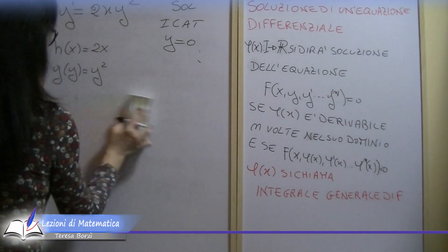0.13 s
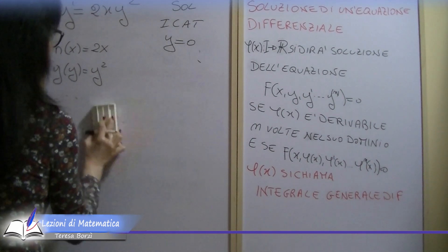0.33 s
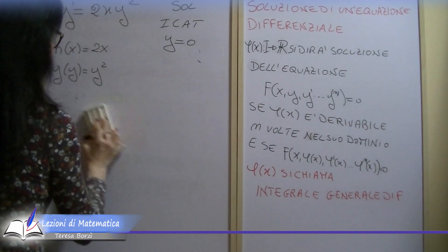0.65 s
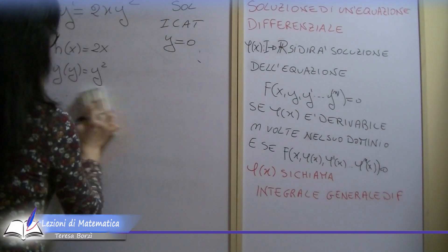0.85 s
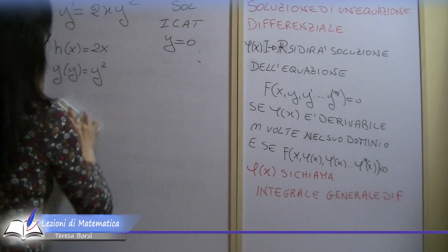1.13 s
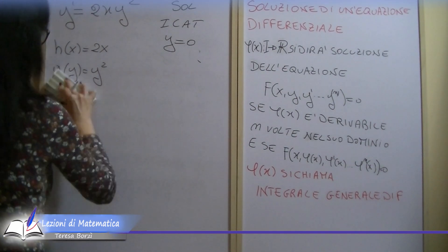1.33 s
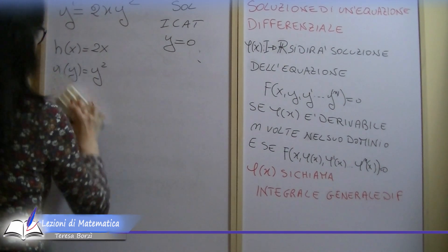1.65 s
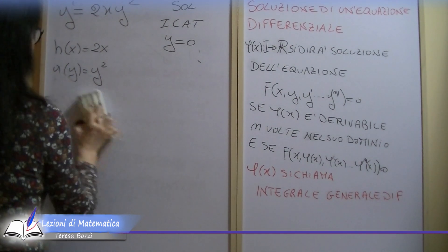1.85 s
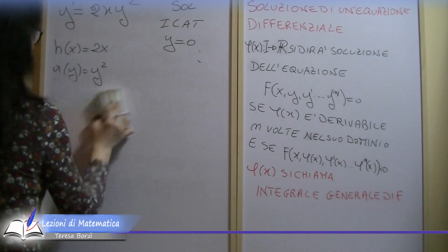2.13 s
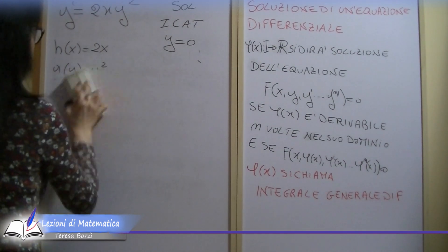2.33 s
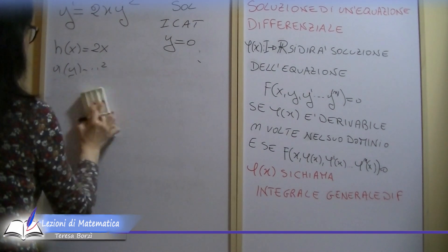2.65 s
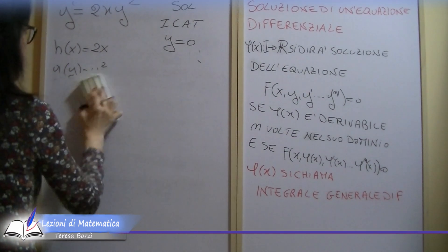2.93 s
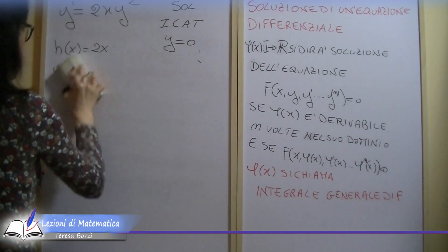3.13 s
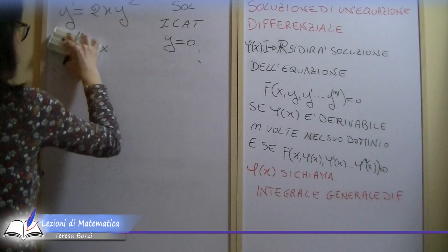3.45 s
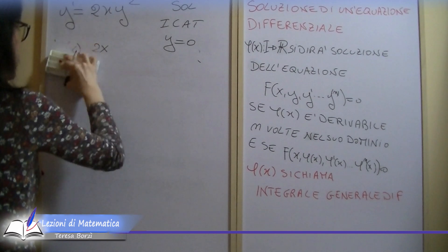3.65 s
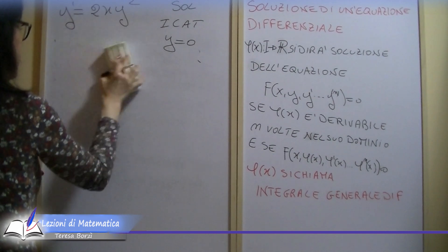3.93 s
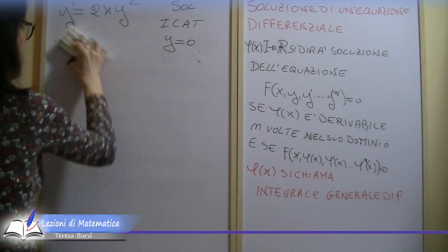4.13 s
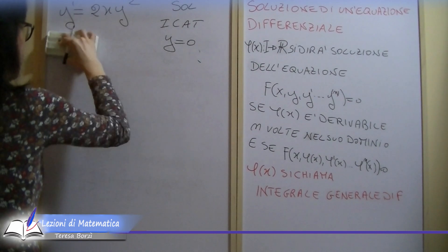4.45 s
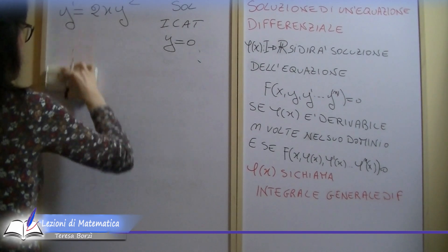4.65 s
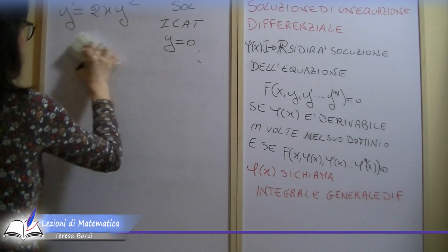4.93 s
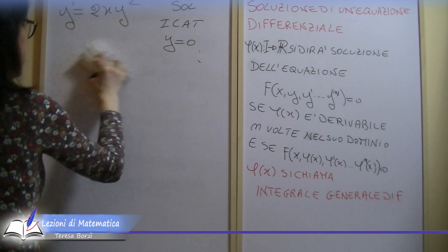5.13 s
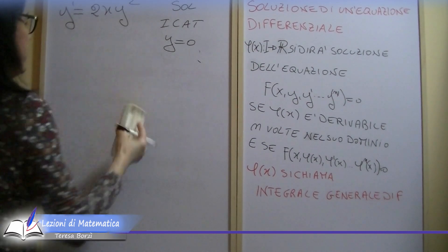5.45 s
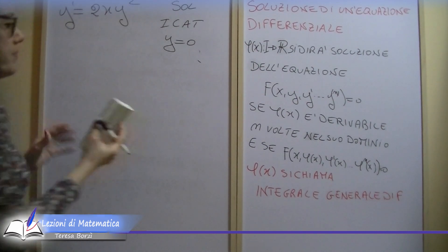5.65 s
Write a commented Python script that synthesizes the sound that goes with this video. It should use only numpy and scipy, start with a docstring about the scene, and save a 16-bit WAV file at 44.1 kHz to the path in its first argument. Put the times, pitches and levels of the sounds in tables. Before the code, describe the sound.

A felt eraser rubs back and forth across a whiteboard in quick, hissing strokes, with a light rasp and a hollow ring from the board. Its holder knocks on the board near the start and again a second later. After about five seconds the eraser lifts off, and the person turns with soft scuffs and a dull heel tap. It sounds close, in a small classroom with faint hiss.

```python
"""A felt eraser hisses back and forth over a whiteboard in a small classroom.
Its fibres stick and slip, which keeps the board and the eraser's hollow holder ringing.
Each push adds a rumble, and twice the holder stumbles and knocks on the board.
Then the eraser lifts off and the person shuffles round, with scuffs and a heel tap.
Room hiss, a thin electronic whine and a short repeating echo colour it all."""
import sys
import numpy as np
from scipy import signal
from scipy.fft import rfft, irfft
from scipy.io import wavfile
from scipy.ndimage import uniform_filter1d

SR = 44100
rng = np.random.default_rng(int(sys.argv[2]) if len(sys.argv) > 2 else 0)


def bounce(signal):
    """Save signal as a 16-bit WAV file at the path given by the first command-line argument."""
    frames = np.transpose(np.atleast_2d(signal))
    limited = np.clip(frames, -1, 1)
    pcm = np.round(limited * 32767).astype(np.int16)
    wavfile.write(sys.argv[1], SR, pcm)


N = 255383
TIME = np.arange(N) / SR
FREQS = np.maximum(np.arange(N // 2 + 1) * SR / N, 1)

# Strokes of the eraser; each starts as the hand turns. Each row: start in seconds, dip at the turn in dB,
# treble lost at the turn in dB, time to regain speed in seconds, rubbing level in dB, then four levels
# in dB against the felt's hiss: board ring, surface rasp, holder ring and hollow note.
HAND_STROKES = [(-0.05, 5.5, -2, 0.012, -42, -6.5, -10, -11, -13.5),
                (.143, 3.5, 0, 0.01, -42, -12, -14.5, -12.5, -13),
                (.44, 0.5, 0, 0.037, -42, -11, -9, -10.5, -8.5),
                (.74, 1.2, -0.5, 0.05, -42, -9.5, -7, -11, -15),
                (1.003, 3, 6, 0.024, -43, -10.5, -3.5, -16, -23),
                (1.419, 6.5, 3, 0.056, -43.5, -8, -3.5, -9, -10),
                (1.785, 3, -6, 0.031, -42.5, -8, -6, -8.5, -8),
                (2.1, 1.4, -1.5, 0.05, -42, -10, -7.5, -12, -9.5),
                (2.464, 1.5, 0, 0.03, -43.5, -13.5, -10, -12.5, -9),
                (2.73, 0, 1, 0.022, -43, -11, -7.5, -11, -10),
                (3.0, 1, -2.5, 0.021, -42.5, -9, -3.5, -15, -8),
                (3.198, 3, 1.5, 0.016, -42.5, -9, -4, -10.5, -20),
                (3.428, 4.5, 2, .022, -42, -12, -3, -10, -18),
                (3.597, 3, .5, 0.037, -42.5, -12, -4, -12, -10),
                (3.88, 2, -3.5, 0.054, -42, -10, -6, -12, -15),
                (4.19, 1, 0.5, 0.03, -43.5, -9.5, -3, -18, -20),
                (4.301, 1, 3, 0.031, -43.5, -12, -5.5, -14, -18),
                (4.439, 3, 1.5, .026, -42.5, -10, -4.5, -15, -16),
                (4.836, 2.7, -4, 0.011, -43, -7, -2.5, -12, -11)]
# The tone of the felt's hiss. Each row: frequency in Hz, relative level in dB.
FELT_TONE = [(100, -77), (300, -15.5), (700, -29.5), (1500, -10), (2500, -5), (3100, -2), (3700, -3),
             (4400, -1.5), (5300, -1.5), (6600, -9.5), (7800, -7.5), (9600, -4.5), (11500, -8.5),
             (13500, -15.5), (15700, -29)]
# The notes the whiteboard rings with. Each row: pitch in Hz, width in Hz, level in dB.
BOARD_NOTES = [(102, 18, -39.5), (150, 9.1, -32), (196, 15, -24.5), (254, 55, -30), (331, 31, -17),
               (380, 117, -23.5), (446, 33, -12), (549, 23, -11), (699.5, 31, -5.5), (846, 81, -4.5),
               (984, 45, 0), (1044, 32, 0.5), (1134, 41, 1.5), (1177, 70, 0.5), (1259, 125, -1),
               (1550, 84, -6.5), (1713, 26, -6)]
# The tone of the rasp from the board's surface. Each row: frequency in Hz, relative level in dB.
RASP_TONE = [(600, -36), (1200, -5), (1550, -1), (1850, -0.5), (2300, 1), (2800, -2.5), (4000, 0.5),
             (8000, -23.5)]
# Moments when the felt catches and sings. Each row: time of the peak in seconds,
# about half its length in seconds, pitch in Hz, level in dB against the rubbing.
FELT_CATCHES = [(0.239, 0.013, 1154, -6), (0.89, 0.046, 3220, -7), (3.077, .03, 3230, -3.5),
                (3.12, 0.03, 1550, -12), (3.277, .025, 1400, -10), (3.516, 0.029, 3320, -8),
                (3.525, 0.02, 1550, -15), (3.682, .03, 1680, -9), (4.015, 0.028, 3290, -2.5),
                (4.06, 0.017, 1175, -6), (4.744, 0.066, 1705, -13), (4.93, 0.022, 3290, -6),
                (4.95, 0.035, 923, -7), (5.05, 0.02, 1170, -4.5), (5.074, 0.028, 1550, -6)]
# The tone of the room's steady hiss. Each row: frequency in Hz, relative level in dB.
ROOM_TONE = [(25, -26), (60, -23), (120, -15.5), (250, -9), (500, 0), (800, 4), (1120, 6), (1600, 1),
             (3000, 2), (5000, 1), (7000, -1.5), (10000, -6), (13000, -9.5), (15700, -9.5)]
# Knocks of the holder on the board. Each row: start in seconds, strength on the board in dB,
# strength of the holder's clack in dB.
HOLDER_KNOCKS = [(0.143, -3.5, -42), (0.172, -14, -40), (0.267, -12.5, -50), (1.281, -10, -27),
                 (1.289, -8, -30), (1.298, -3, -23), (1.325, -4, -27)]
# The notes the knocked holder clacks with. Each row: pitch in Hz, width in Hz, level in dB.
HOLDER_NOTES = [(418, 71, -2.5), (520, 33, -1), (656, 45, 0), (800, 76, -5), (965, 42, 4.5), (1560, 55, -7),
                (2200, 79, -5), (2310, 50, -7)]
# Shoe and sleeve scuffs. Each row: start, rise time and fade time in seconds,
# centre and width of the noise in Hz, level of that noise in dB, level of the grit in dB.
BODY_SCUFFS = [(5.399, 0.0073, 0.016, 4600, 1600, -48.5, -44.5), (5.41, 0.011, 0.03, 895, 241, -47, -58),
               (5.437, 0.016, 0.018, 955, 130, -49, -62), (5.53, .012, 0.09, 517, 300, -51.5, -66),
               (5.55, 0.026, .11, 568, 90, -55, -72), (5.596, 0.021, 0.037, 1730, 1230, -43.5, -52),
               (5.6, 0.013, 0.043, 215, 110, -63.5, -72), (5.755, 0.026, .06, 2090, 3600, -44.5, -65)]
# The tone of the grit in a scuff. Each row: frequency in Hz, relative level in dB.
GRIT_TONE = [(100, -52), (1500, -1), (3600, -12), (4700, -1), (5550, -5), (5850, 2), (6400, -8),
             (10000, -13), (15000, -22)]
# A heel taps the floor. One row: start in seconds, centre in Hz, width in Hz, peak level in dB.
HEEL_TAP = (5.5314, 580, 480, -38)
# How wide the sound is. Each row: frequency in Hz, level in dB of the sides against the middle.
STEREO_WIDTH = [(30, 4), (80, -14), (300, -9), (700, -14), (1400, -28), (2800, -22.5), (5500, -14.5),
                (10000, -18), (14000, -36)]

LAST_HOLLOW_SWELL_END_S, LIFT_OFF_S = 4.93, 5.114


def from_db(db):
    """Turn decibels into a number to multiply by."""
    return 10 ** (np.asarray(db) / 20)


def unit_level(sound):
    """Scale a sound so that its average power is 1."""
    return sound / np.sqrt(np.mean(sound ** 2) + 1e-20)


def noise():
    """An even hiss: white noise."""
    return rng.standard_normal(N)


def drift(rate_hz):
    """A slow random wobble, about 1 in size."""
    return unit_level(irfft(rfft(noise()) / (1 + (FREQS / rate_hz) ** 2) ** 2, N))


def click(start):
    """The shortest possible blow: one sample."""
    return np.arange(N) == round(start * SR)


def hump(peak_s, half_s):
    """A smooth rise and fall around a moment."""
    return np.exp(-0.5 * ((TIME - peak_s) / half_s) ** 2)


def swell(start, rise_s, fade_s):
    """A straight rise, then a fade that slows as it goes."""
    rising = np.clip((TIME - start) / rise_s, 0, 1)
    return rising * np.exp(-np.maximum(TIME - start - rise_s, 0) / fade_s)


def colour(sound, tone):
    """Turn frequencies up or down to follow a tone table."""
    hz, db = np.transpose(tone)
    curve_db = np.interp(np.log(FREQS), np.log(hz), db)
    return irfft(rfft(sound) * from_db(curve_db), N)


def band(sound, hz, width_hz, order):
    """Keep the frequencies around a centre; order 1 rings like a single note."""
    low = np.hypot(hz, width_hz / 2) - width_hz / 2
    return signal.sosfilt(signal.butter(order, [low, low + width_hz], "band", fs=SR, output="sos"), sound)


def soften(sound, hz, order):
    """Keep the lows, as a soft contact or a wall does."""
    return signal.sosfilt(signal.butter(order, hz, fs=SR, output="sos"), sound)


def ringing(force, notes):
    """A force sets all of an object's notes ringing at once."""
    return sum((-1) ** k * from_db(db) * band(force, hz, width, order=1)
               for k, (hz, width, db) in enumerate(notes))


def slips(per_s, spread_db):
    """Surfaces stick and let go in tiny clicks of uneven size, so many that they merge."""
    size = from_db(spread_db * np.clip(noise(), -2, 2))
    slipping = rng.random(N) < per_s / SR
    return unit_level(slipping * np.sign(noise()) * size)


def stroke_levels():
    """Each stroke has its own levels; as the hand turns, the rubbing dips and its treble shifts."""
    blend_s, slowing_share = 0.085, 0.87  # slowing down is quicker than speeding up
    starts, _, _, _, *levels = np.transpose(HAND_STROKES)
    current = np.maximum(np.searchsorted(starts, TIME) - 1, 0)
    rub_db, *ringing_db = [uniform_filter1d(db[current], int(blend_s * SR)) for db in levels]
    dull_db = 0
    for start, dip_db, treble_loss_db, regain_s, *_ in HAND_STROKES:
        turn = hump(start, np.where(TIME < start, slowing_share * regain_s, regain_s))
        rub_db = rub_db - dip_db * turn
        dull_db = dull_db + treble_loss_db * turn
    return rub_db, dull_db, *ringing_db


def felt_hiss(slips_per_s, treble_db):
    """Patches of felt grip in turn, so seven bands of the hiss each waver by about 1 dB."""
    spectrum = rfft(colour(slips(slips_per_s, spread_db=2), FELT_TONE))
    half_octaves = np.clip(2 * np.log2(FREQS / 2000), 0, 6)
    patches = [irfft(spectrum * np.maximum(1 - np.abs(half_octaves - k), 0), N) for k in range(7)]
    hiss = unit_level(sum(patch * from_db(drift(rate_hz=12)) for patch in patches))
    lows = soften(hiss, hz=7000, order=1)
    return lows + (hiss - lows) * from_db(treble_db)


def holder_ring(slips_per_s):
    """The rubbed holder rings high, swelling and fading as the grip shifts."""
    ring = band(slips(slips_per_s, spread_db=2), hz=3290, width_hz=250, order=1)
    return unit_level(ring) * from_db(1.5 * drift(rate_hz=13))


def hollow_note():
    """The holder's hollow note is fullest in mid-stroke, where the hand is fastest."""
    left_at_turn = 0.64
    turns = [start for start, *_ in HAND_STROKES] + [LAST_HOLLOW_SWELL_END_S]
    strokes_done = np.interp(TIME, turns, np.arange(len(turns)))
    speed = np.abs(np.sin(np.pi * strokes_done))
    note = unit_level(band(slips(12000, spread_db=1), hz=1170, width_hz=135, order=2))
    return note * (left_at_turn + (1 - left_at_turn) * speed)


def eraser():
    """Slipping fibres hiss and drive the holder and the board; a stronger stroke makes more slips."""
    rub_db, dull_db, board_db, rasp_db, holder_db, hollow_db = stroke_levels()
    lift_loss_db = 6.5 * (np.maximum(TIME - LIFT_OFF_S, 0) / 0.11) ** 2
    effort_db = np.clip(rub_db - lift_loss_db - np.median(rub_db), -5, 5)
    slips_per_s = 26000 * from_db(effort_db / 2)
    hiss = felt_hiss(slips_per_s, treble_db=0.28 * effort_db - dull_db)  # quicker slips are sharper
    holder = from_db(holder_db) * holder_ring(slips_per_s)
    board = from_db(board_db) * unit_level(ringing(slips(slips_per_s, spread_db=3), BOARD_NOTES))
    rasp = from_db(rasp_db) * unit_level(colour(slips(slips_per_s / 2, spread_db=3.5), RASP_TONE))
    rings = holder + board + rasp + from_db(hollow_db) * hollow_note() + felt_catches()
    # At lift-off the trailing edge still drives the ringing, so it fades later than the hiss.
    return from_db(rub_db) * (from_db(-lift_loss_db) * hiss + from_db(-0.6 * lift_loss_db) * rings)


def room_hiss():
    """The room's quiet, steady background noise."""
    return from_db(-49.5) * unit_level(colour(noise(), ROOM_TONE))


def whine():
    """The electronics give off a thin, very high tone that wavers a little."""
    pitch_hz, level_db = 15625, -59.5
    level = from_db(level_db + drift(rate_hz=12))
    return level * np.sin(2 * np.pi * pitch_hz * TIME + 0.5 * drift(rate_hz=15))


def push_rumble():
    """The arm leans in at a steady pace, hardest the first time, and shakes the board's low notes."""
    first_s, every_s, level_db, first_extra_db = 0.165, 0.481, -65, 8
    pushes = sum(from_db(level_db + first_extra_db * (k == 0)) * hump(peak_s, half_s=0.047)
                 for k, peak_s in enumerate(np.arange(first_s, LIFT_OFF_S, every_s)))
    force = soften(slips(1500, spread_db=1), hz=132, order=2)
    return pushes * unit_level(ringing(force, BOARD_NOTES))


def holder_knocks():
    """The holder stumbles and clacks; its felt-cushioned blows leave the board flexing and rumbling."""
    starts, board_db, clack_db = np.transpose(HOLDER_KNOCKS)

    def rattle(levels_db, fade_s):
        """A spray of tiny contacts after each knock, falling 60 dB in fade_s."""
        level = sum(from_db(db - 60 * np.maximum(TIME - start, 0) / fade_s) * (TIME >= start)
                    for start, db in zip(starts, levels_db))
        return level * slips(9000, spread_db=-1.5)

    def blows(levels_db):
        """One sharp blow for each knock."""
        return sum(from_db(db) * click(start) for start, db in zip(starts, levels_db))

    clack = ringing(blows(clack_db + 17) + rattle(clack_db, fade_s=0.12), HOLDER_NOTES)
    thud = soften(blows(board_db + 4.5), hz=700, order=1)
    chatter = from_db(-36) * soften(rattle(board_db, fade_s=0.072), hz=480, order=1)
    flex = from_db(-10) * band(rattle(board_db, fade_s=0.38), hz=194, width_hz=190, order=2)
    return clack + ringing(thud + chatter + flex, BOARD_NOTES)


def felt_catches():
    """The felt catches for a moment, and a swell of slips sets one narrow note singing."""
    sound = np.zeros(N)
    for peak_s, half_s, hz, db in FELT_CATCHES:
        note = unit_level(band(slips(14000, spread_db=2.5), hz, width_hz=62, order=2))
        sound += from_db(db) * hump(peak_s, half_s) * note
    return sound


def scuffs():
    """Shoes and sleeves rub as the person turns: short puffs of noise with bright grit on top."""
    grit = unit_level(colour(slips(12000, spread_db=3), GRIT_TONE))
    sound = np.zeros(N)
    for start, rise_s, fade_s, hz, width_hz, puff_db, grit_db in BODY_SCUFFS:
        puff = unit_level(band(noise(), hz, width_hz, order=2))
        sound += from_db(puff_db) * swell(start, rise_s, fade_s) * puff
        sound += from_db(grit_db) * swell(start, rise_s=0.0082, fade_s=0.038) * grit
    return sound


def heel_tap():
    """A heel meets the floor in one dull tap."""
    start, hz, width_hz, peak_db = HEEL_TAP
    tap = band(click(start) + 1e-18, hz, width_hz, order=2)
    return from_db(peak_db) * tap / np.abs(tap).max()


def reflections(sound):
    """Sound bounces around the classroom and blurs into a short tail of about the same power."""
    fade_s = 0.3  # time to fall 60 dB
    tail = noise() * from_db(-60 * TIME / fade_s)
    return signal.fftconvolve(sound, tail / np.sqrt(np.sum(tail ** 2)))[:N]


def stereo_spread(sound):
    """Reflections reach the two close microphone openings slightly differently."""
    lean_left_db = 0.15
    side = colour(reflections(sound), STEREO_WIDTH)
    left = (sound + side) * from_db(lean_left_db)
    right = (sound - side) * from_db(-lean_left_db)
    return np.array([left, right])


def short_echo(sound):
    """An echo repeats three times, flipped and thinner each time, for a slightly hollow sound."""
    delay_samples, feedback = 299, -0.35
    echo = sound
    for _ in range(3):
        thinned = band(echo, hz=3980, width_hz=10300, order=1)
        echo = feedback * np.pad(thinned, [(0, 0), (delay_samples, 0)])[:, :N]
        sound = sound + echo
    return sound


def scene():
    """Eraser, board and person over the classroom's hiss; the walls soak up the treble."""
    direct = eraser() + push_rumble() + holder_knocks() + scuffs() + heel_tap()
    reverb = from_db(-8.5) * soften(reflections(direct), hz=2600, order=1)
    return stereo_spread(direct + reverb + room_hiss())


def record(dry):
    """Add the short echo and the whine, then cut off the very highest treble."""
    cutoff_hz = 15800
    steep_cut = signal.ellip(12, 0.1, 80, cutoff_hz, fs=SR, output="sos")
    return signal.sosfilt(steep_cut, short_echo(dry) + whine())


dry = scene()
out = record(dry)
bounce(out)
```